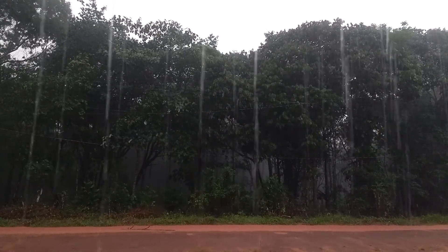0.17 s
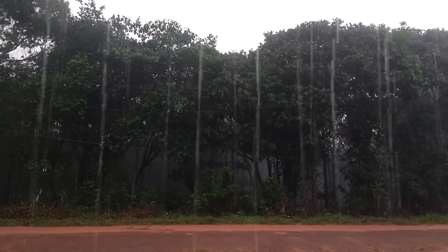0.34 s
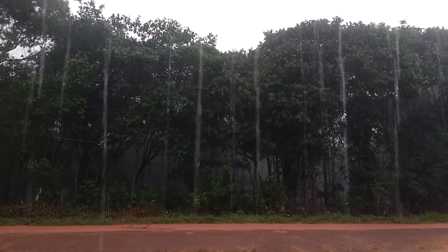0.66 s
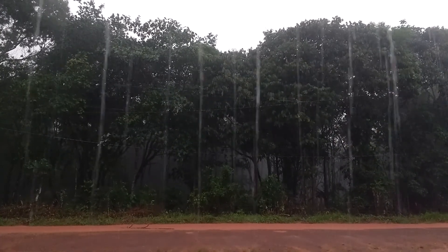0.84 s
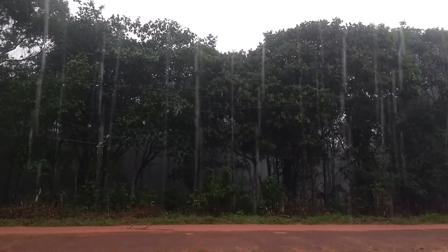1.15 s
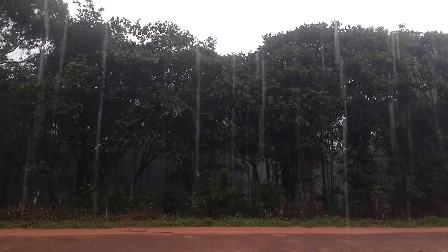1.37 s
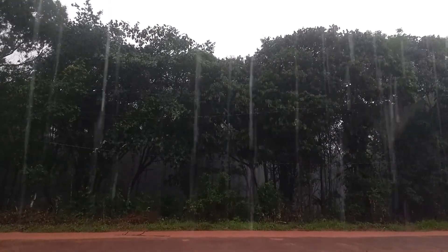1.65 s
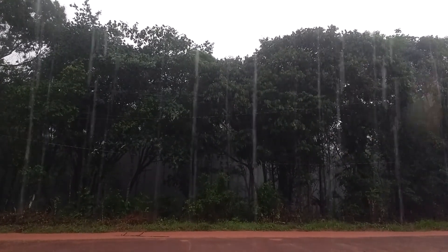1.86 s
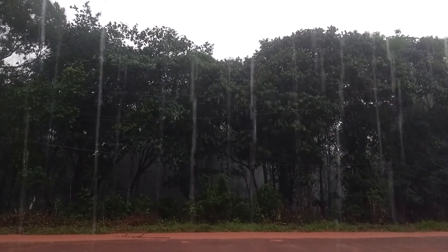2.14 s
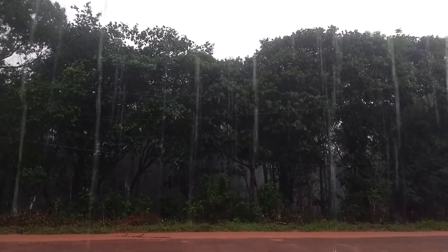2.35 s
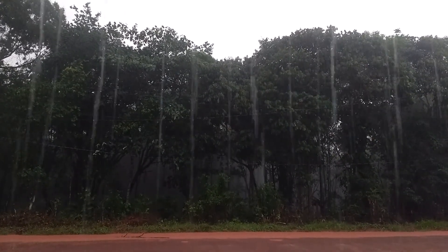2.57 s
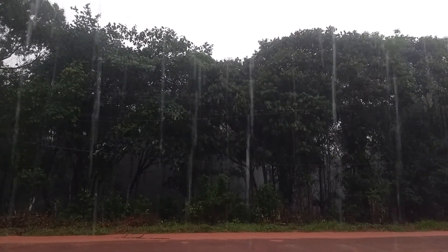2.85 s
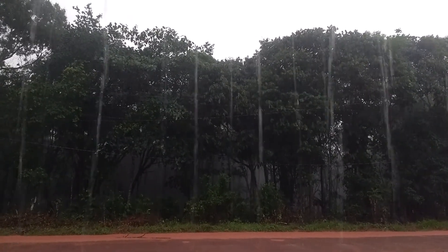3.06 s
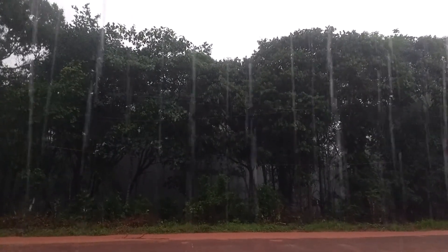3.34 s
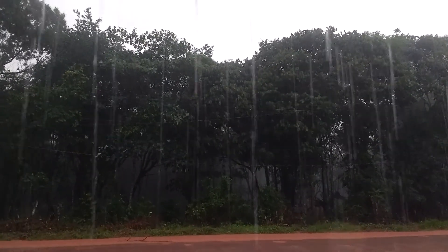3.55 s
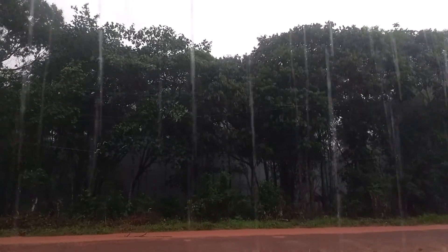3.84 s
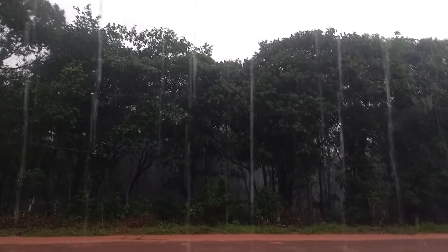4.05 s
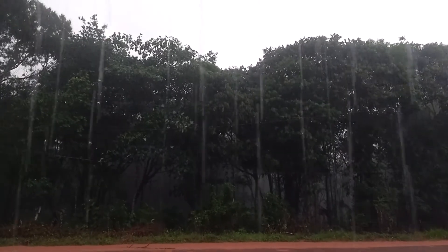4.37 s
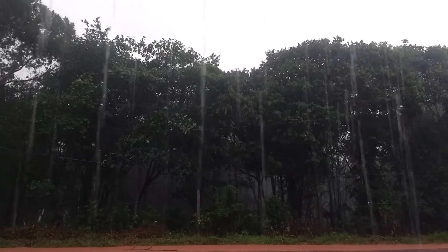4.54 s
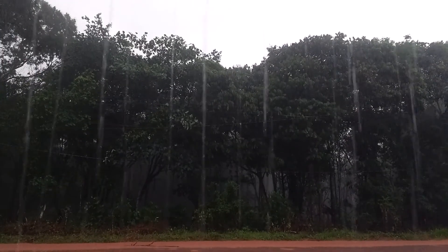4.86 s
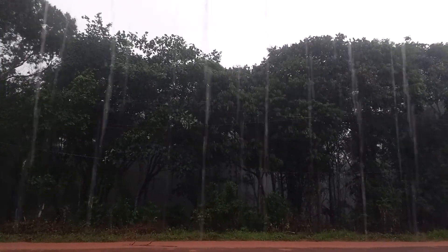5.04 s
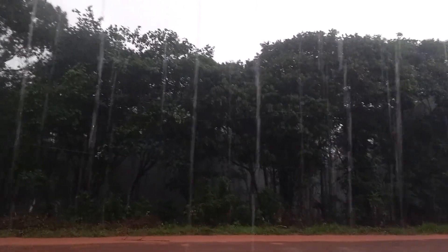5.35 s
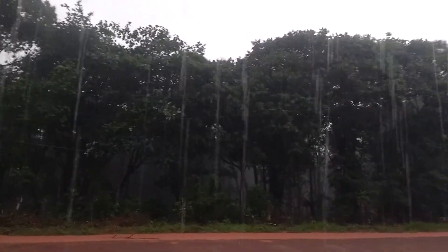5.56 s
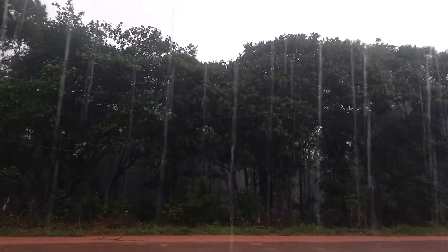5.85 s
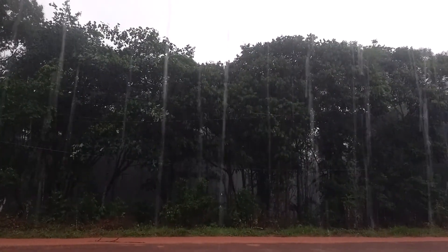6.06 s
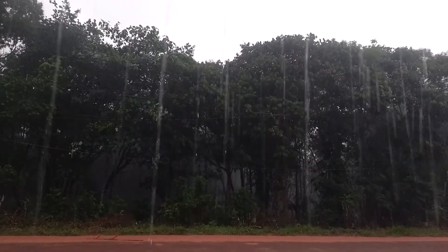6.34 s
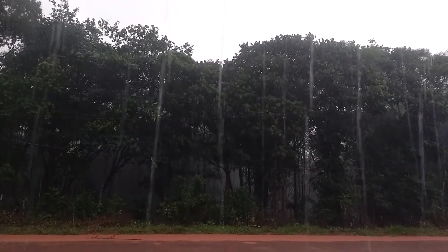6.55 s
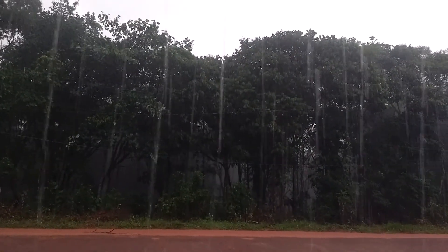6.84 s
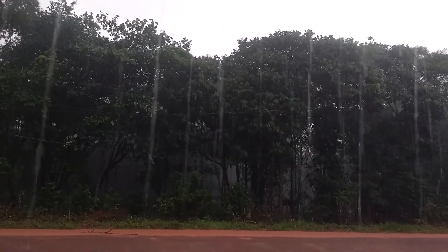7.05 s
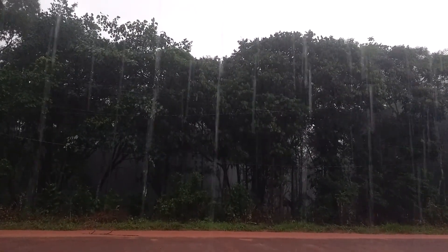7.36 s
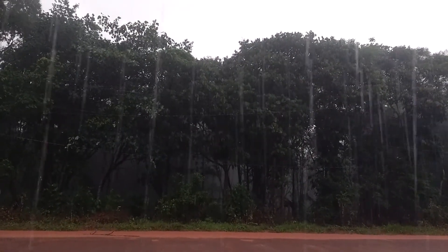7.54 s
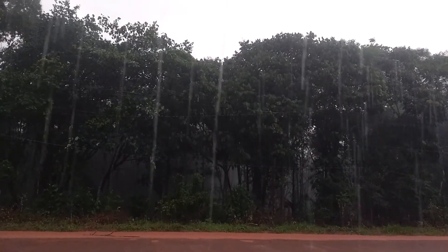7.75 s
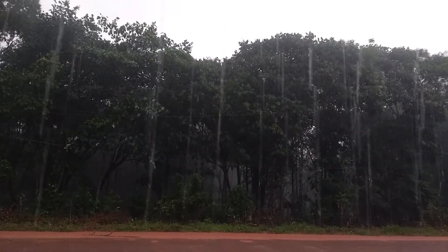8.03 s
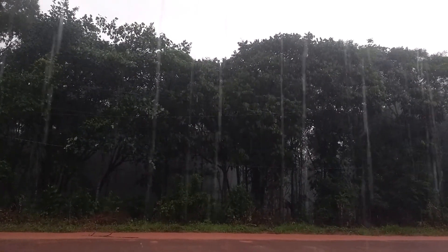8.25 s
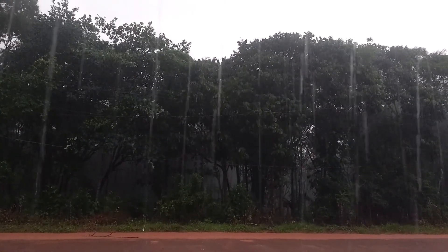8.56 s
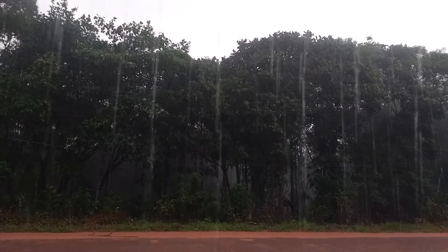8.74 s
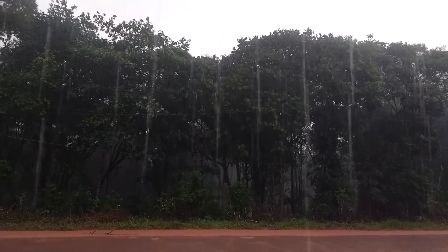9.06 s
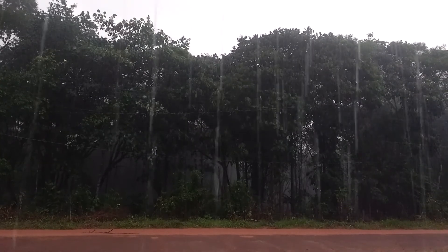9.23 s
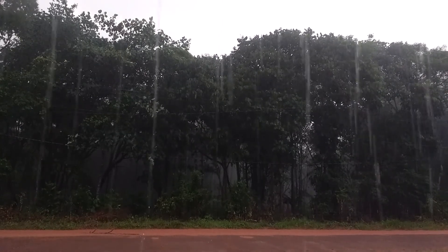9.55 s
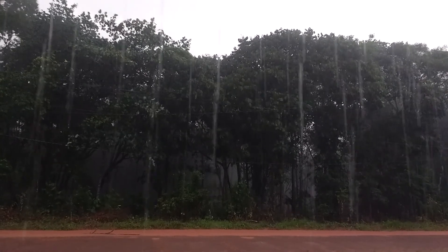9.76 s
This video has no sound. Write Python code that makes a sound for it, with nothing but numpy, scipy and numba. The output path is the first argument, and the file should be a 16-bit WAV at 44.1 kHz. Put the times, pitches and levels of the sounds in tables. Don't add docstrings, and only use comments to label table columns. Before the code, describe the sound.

Heavy rain is in full flow from 0 s and lasts to the end at about 10 s. Innumerable drops on leaves and earth fuse into a dense, bright, wide hiss, over a quieter soft drumming with little deep bass. Run-off from the eaves spatters nearby in quick uneven bursts, with small surges around 0.6, 2.6, 3.3, 5.4, 5.8 and 7.5 s. Close drops stand out lightly: a soft smack at 1.4, bright ticks near 1.9 and 2.05, a plop at 3.9, lower plops around 5.0 and a strong sharp tick at 6.8. The rain eases slightly near 7.7, then swells at 8.2. A loud wet smack hits off to one side at 9.5. The open-air phone stereo sounds slightly hollow, its level dipping after peaks and recovering within fractions of a second.

```python
import sys
import numpy as np
from scipy import signal
from scipy.fft import rfft, irfft
from scipy.io import wavfile
from scipy.ndimage import uniform_filter1d
from numba import njit

SR = 44100
rng = np.random.default_rng(int(sys.argv[2]) if len(sys.argv) > 2 else 0)


def boost(x):
    u = np.asarray(x, float) / 20
    return 10 ** u


def log_audio(samples):
    frames = np.atleast_2d(samples).T
    limited = np.clip(frames, -1, 1)
    pcm = np.round(limited * 32767).astype(np.int16)
    wavfile.write(sys.argv[1], SR, pcm)


N = 436574
HZ = np.fft.rfftfreq(N, 1 / SR)
PORT_GAP = 18


def gain_at(table):
    hz, db = np.transpose(table)
    return boost(np.interp(np.log(HZ + 1), np.log(hz), db))


def unit(x):
    return x / np.sqrt(np.mean(x ** 2))


def walk(rate):
    hold = int(SR / rate)
    steps = np.repeat(rng.standard_normal(N // hold + 1), hold)
    return unit(uniform_filter1d(steps, hold)[:N])


def downpour(count, spread_db):
    when, side, big, sign = rng.random((count, 4)).T
    size = boost(np.minimum(-spread_db * np.log(1 - big), 14)) * np.sign(sign - 0.5)
    first = (when * (N - 2 * PORT_GAP)).astype(int) + PORT_GAP
    lag = np.rint((2 * side - 1) * PORT_GAP).astype(int)
    return unit(np.array([np.bincount(first, size, N), np.bincount(first + lag, size, N)]))


@njit
def add_rings(out, start, hz, cycles, size, lag):
    for k in range(len(start)):
        turn = np.exp((2j * np.pi - 3 / cycles[k]) * hz[k] / SR)
        for port in range(2):
            t = start[k] + port * lag[k]
            i = int(np.ceil(t))
            z = size[k] * turn ** (i - t)
            end = min(i + int(2 * cycles[k] * SR / hz[k]) + 2, out.shape[1])
            for j in range(max(i, 0), end):
                out[port, j] += z.imag
                z *= turn


def runoff(count, spread_db, low_hz, high_hz, cycles):
    when, side, big, pitch = rng.random((count, 4)).T
    out = np.zeros((2, N))
    hz = low_hz * (high_hz / low_hz) ** pitch
    size = boost(np.minimum(-spread_db * np.log(1 - big), 12.5)) * hz
    add_rings(out, when * N, hz, cycles + 0 * hz, size, (2 * side - 1) * PORT_GAP)
    return unit(out)


def spray(hz, flicker_db):
    flicker = boost(flicker_db * walk(22) + 2.62 * walk(110))
    bursts = flicker * downpour(count=80000, spread_db=4.5)
    return rfft(bursts) / (1 + ((HZ / hz - hz / (HZ + 1)) / 0.77) ** 2)


# time in seconds, level in dB.
SLOW_SWELL = [(0, 0), (.7, 0.74), (1.3, -0.4), (2.0, 0.37), (2.9, -1), (3.5, -0.3), (4.9, -0.45),
              (6.4, 0.33), (7.7, -2.6), (8.2, 1), (9.0, -1.2), (9.9, -1.6)]
# middle in seconds, extra level in dB.
WATER_SHEETS = [(.63, 2), (.87, -0.4), (1.4, 1.5), (1.61, 1.5), (2.21, 0.5), (2.62, 2), (3.33, 3),
                (3.5, 2.2), (3.77, 0.9), (3.94, -0.3), (4.71, 0.7), (5.4, 2.5), (5.77, 3), (6.42, 1.4),
                (7.45, 2), (7.98, 1.5), (8.19, 0.5), (8.78, 0.5), (9.15, 1.3)]


def flow_db(t):
    half_length_s = 0.042
    sheets = sum(db * np.exp(-((t - s) / half_length_s) ** 2) for s, db in WATER_SHEETS)
    return np.interp(t, *np.transpose(SLOW_SWELL)) + sheets


# frequency in Hz, level in dB.
RAIN_COLOUR = [(40, -31), (130, -9.5), (250, -6), (550, -2.5), (900, 0), (1400, -1.5), (2100, 2),
               (2700, -3), (3900, -6), (7400, -5.5), (8800, -5), (11800, -3), (13900, -3.5), (15300, -8)]


def rainfall():
    flow = flow_db(np.arange(N) / SR)
    rain = downpour(count=900000, spread_db=1.5)
    rain = rain + boost(-9) * runoff(count=6000, spread_db=1.5, low_hz=1460.0, high_hz=12000.0, cycles=1.24)
    mist = boost(-7.5) * spray(hz=2620.0, flicker_db=5.5)
    mist = mist + boost(-4.5) * spray(hz=5540.0, flicker_db=2.5)
    mist = mist + boost(-5) * spray(hz=13000.0, flicker_db=1.5)
    tone = (rfft(rain) + mist) * gain_at(RAIN_COLOUR)
    split_hz = 2220
    low = 1 / (1 + (HZ / split_hz) ** 4)
    drum_level = boost(-28 + 0.85 * flow + 0.31 * walk(18))
    drum = unit(irfft(tone * low, N)) * drum_level
    hiss = unit(irfft(tone * (1 - low), N)) * boost(-21.5 + flow)
    return drum + hiss


# start in seconds, peak in dB, ring in Hz, side from -1 to 1,
# ring length in cycles.
CLOSE_DROPS = [(0.8726, -10.5, 1670, 0.1, 5), (1.3937, -13, 1460, 0.1, 2.5), (1.8786, -9, 8440, 0.1, 2.5),
               (3.6815, -21, 1060, 0.1, 2.5), (3.8586, -7, 3190, 0.1, 2.7), (4.6179, -15, 8610, 0.1, 2.5),
               (4.9772, -11, 1680, 0.1, 2.9), (5.014, -27, 1510, 0.1, 2.5), (5.0464, -5, 2070, 0.1, 3),
               (6.8264, 2, 9010, 0.086, 3.7), (7.5477, -24, 1260, 0.1, 2.5), (2.0465, -6, 12000, 0.3, 2.5),
               (2.2297, -8, 5300, 0.3, 3), (2.6354, -8, 7000, 0.3, 1.5), (3.515, -8, 6000, 0.3, 1.5),
               (4.1227, -8, 7000, 0.3, 1.5), (6.4510, -6, 7000, 0.3, 1.5), (6.9755, -6, 13000, 0.3, 2.5),
               (8.605, -8, 7000, 0.3, 1.5), (0.569, -7, 7000, 0.3, 1.5), (8.397, -7, 7000, 0.3, 1.5),
               (9.5214, 2.9, 3000, .62, 2.8),
    (9.5215, -3.5, 6000, .6, 4.0),
    (1.3948, -5, 3200, -.1, 5),
]


def close_drops():
    s, db, hz, side, cycles = np.transpose(np.array(CLOSE_DROPS))
    out = np.zeros((2, N))
    lag = np.clip(side, -1, 1) * PORT_GAP
    add_rings(out, s * SR, hz, np.clip(cycles, 0.5, 12), boost(db - 2), lag)
    no_bass = signal.butter(2, 900, "high", fs=SR, output="sos")
    out = signal.sosfilt(no_bass, out)
    t = np.arange(1500) / SR
    spatter = boost(-29) * rng.standard_normal(len(t)) * np.exp(-t / 0.008)
    return out + signal.fftconvolve(out, spatter[None])[:, :N]


def scene():
    return rainfall() + close_drops()


# frequency in Hz, gain in dB.
LEFT_SLOT = [(300, -1.1), (4000, -0.8), (6500, 3), (8300, -6), (10000, 2.5), (13000, -19), (14600, -30),
             (15200, -33)]
# frequency in Hz, gain in dB.
SUBTRACTED_SHARE = [(300, 0.6), (3800, 3), (5000, 6), (6200, -28), (7500, -2.2), (8700, -7), (10000, -10.5),
                    (13000, -30), (14600, -30), (15200, -45)]
# frequency in Hz, gain in dB.
LEFT_TRIM = [(200, -2.5), (2000, -2), (3800, -2), (5000, -3.5), (6900, -7), (8700, 2.5), (10400, -10.5),
             (13000, 4), (15300, -10)]


def widen(dry):
    a, b = rfft(dry) * [gain_at(LEFT_SLOT), 1 + 0 * HZ]
    late = gain_at(SUBTRACTED_SHARE) * np.exp(-2j * np.pi * HZ * PORT_GAP / SR)
    alike = np.sinc(2 * HZ * PORT_GAP / SR)
    top_hz = 15480
    lift = (HZ < top_hz) / np.sqrt(1 + np.abs(late) ** 2 - 2 * alike * late.real + 0.0036)
    lift = lift * [gain_at(LEFT_TRIM), 1 + 0 * HZ]
    cross = late * [b, a] * lift
    return irfft([a, b] * lift - cross, N), cross


# middle in Hz, how far the valley fills in dB.
UNSTEADY_VALLEYS = [(2450, 4), (4950, 6), (7500, 14)]


def valley_refill(cross):
    refill = 0
    for hz, slack_db in UNSTEADY_VALLEYS:
        region = irfft(cross * np.exp(-((HZ - hz) / 820.0) ** 2), N)
        fits = np.clip(walk(16) - 0.85, 0, 1.2)
        refill = refill + region * (1 - boost(-slack_db * fits))
    return refill


# time in seconds, dB turned down.
GAIN_DROPS = [(1.03, 2.5), (1.645, 1.4), (2.049, 4), (2.232, 1.5), (2.64, 3), (3.52, 1.1), (4.125, 2),
              (4.77, 3), (5.42, 1.5), (5.795, 1.2), (6.47, 1.1), (6.745, 2.5), (6.831, 2.5), (6.978, 3),
              (7.07, 0.5), (8.015, 2.5), (8.61, 2.5), (9.528, 4)]


def gain_control_db():
    s, db = np.transpose(GAIN_DROPS)
    recover_db_per_s = 10
    climb = np.cumsum(recover_db_per_s / SR - np.bincount((s * SR).astype(int), db, N))
    return uniform_filter1d(climb - np.maximum.accumulate(climb), size=100)


def roll_off(x):
    return signal.sosfilt(signal.butter(12, 15750, fs=SR, output="sos"), x)


def record(dry):
    wide, cross = widen(dry)
    out = wide + valley_refill(cross)
    mix = out * boost(-0.36 + gain_control_db())
    return roll_off(mix)


dry = scene()
out = record(dry)
log_audio(out)
```